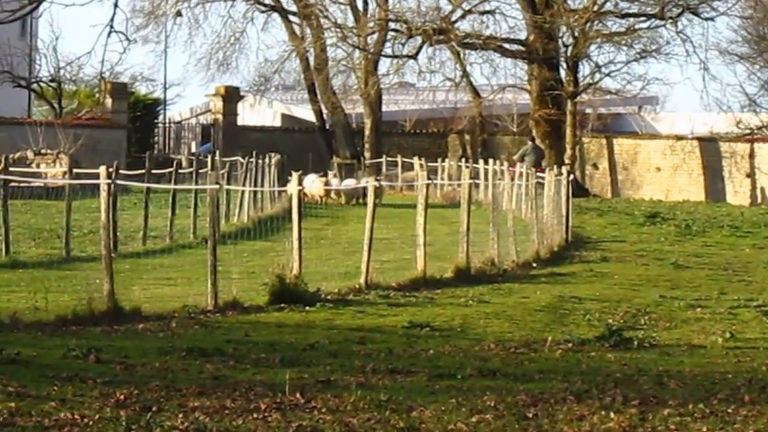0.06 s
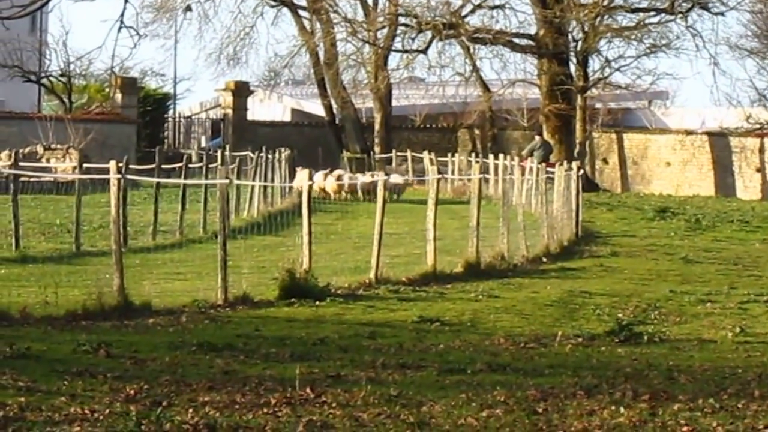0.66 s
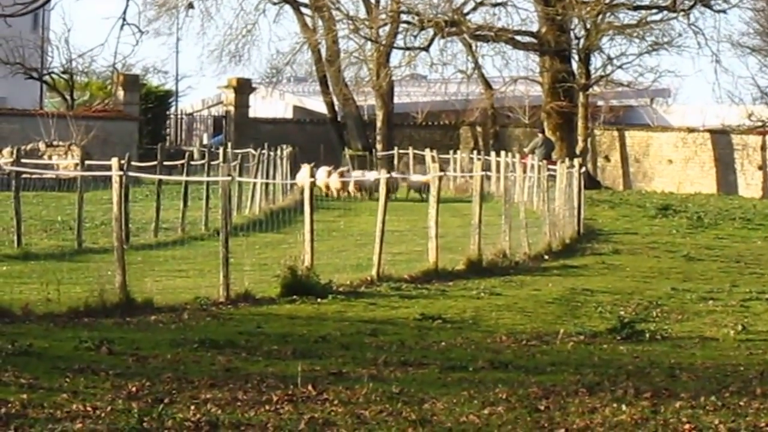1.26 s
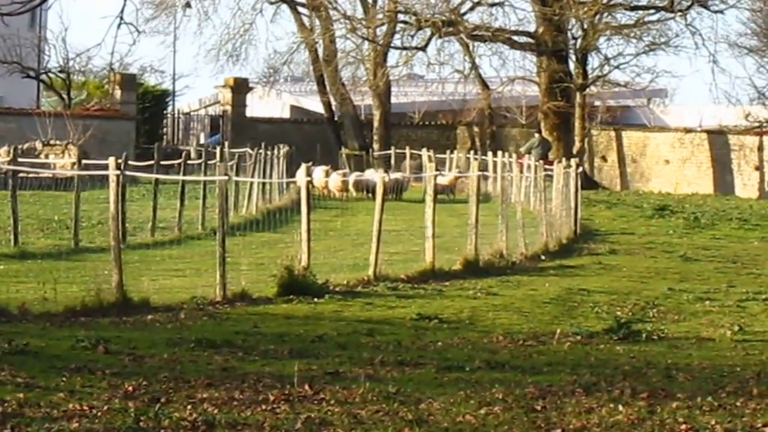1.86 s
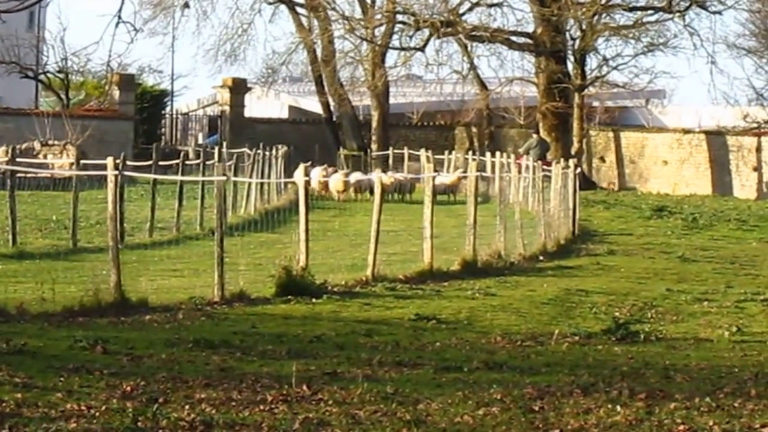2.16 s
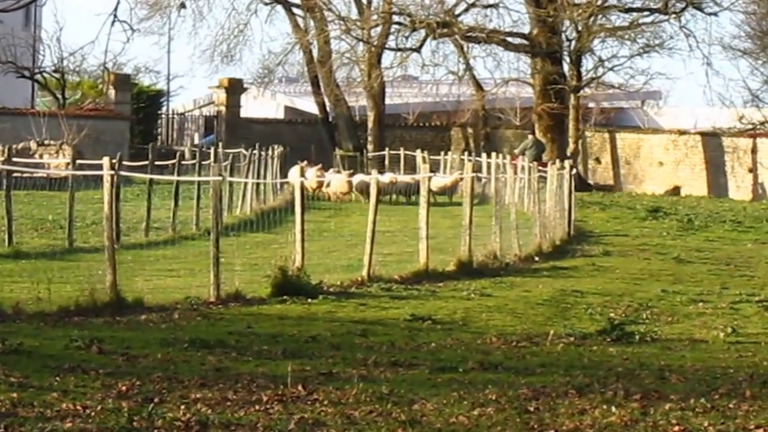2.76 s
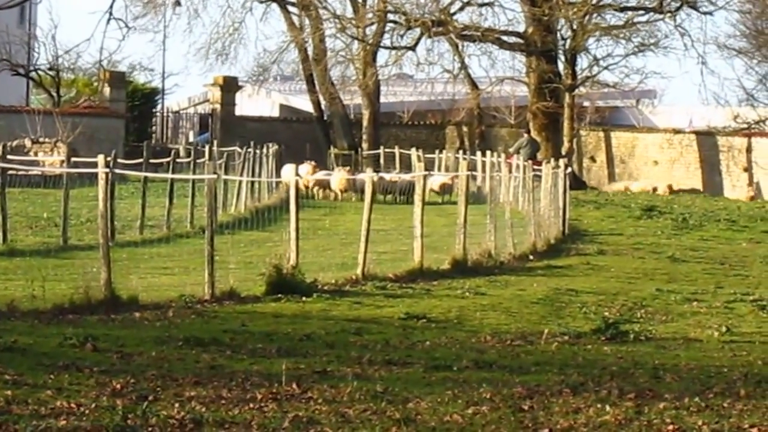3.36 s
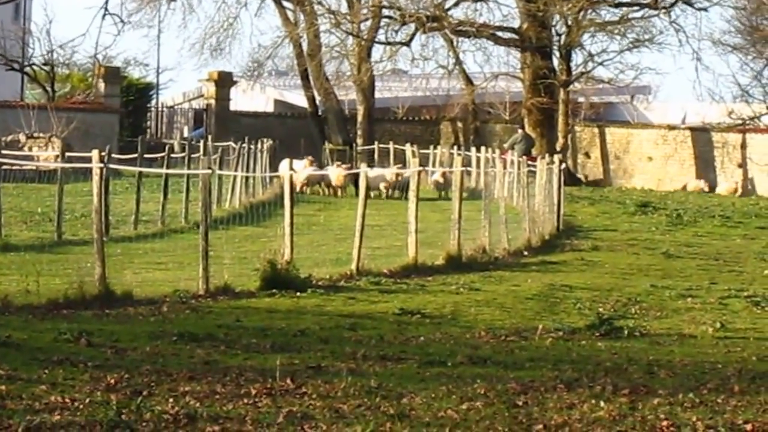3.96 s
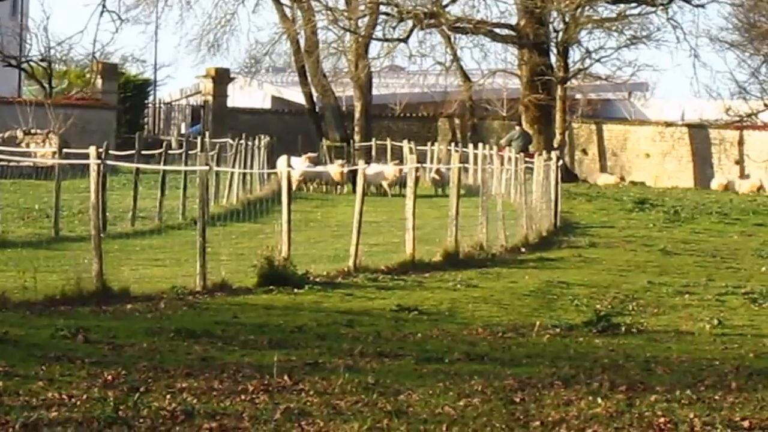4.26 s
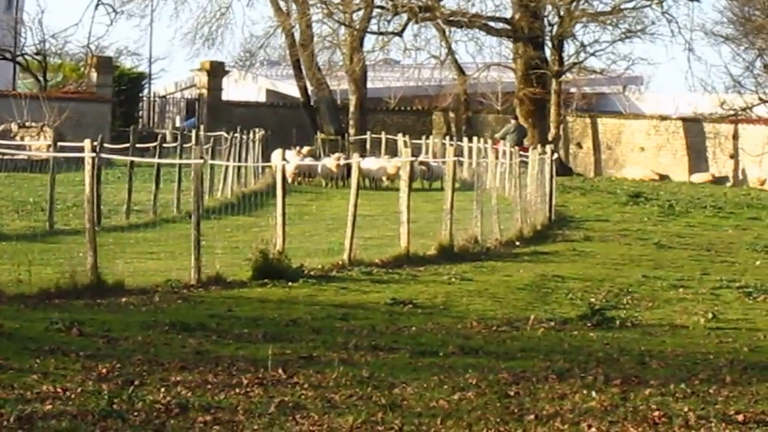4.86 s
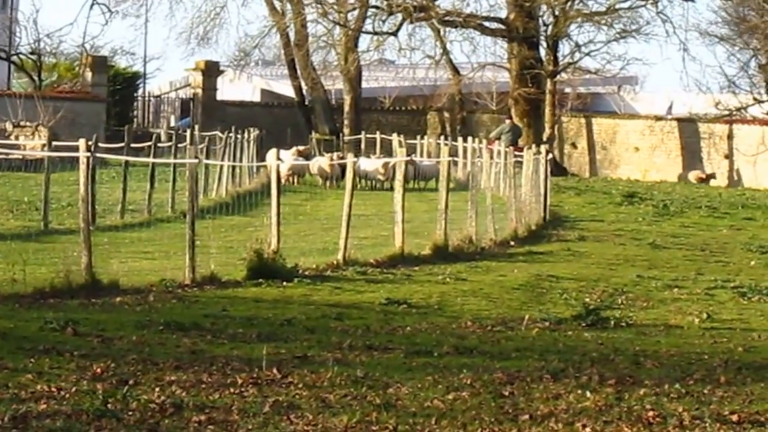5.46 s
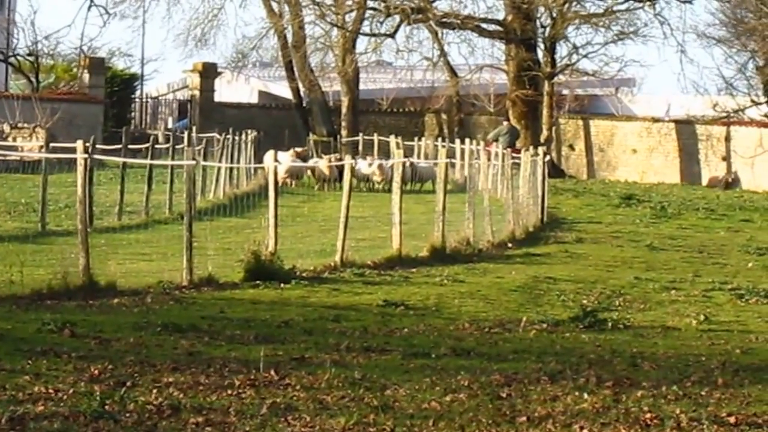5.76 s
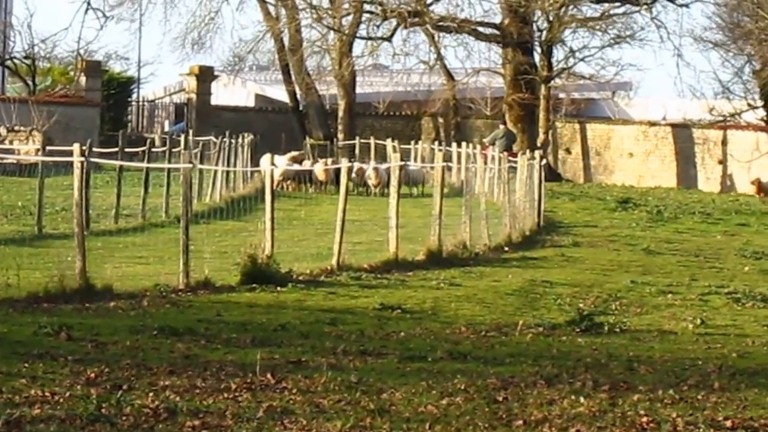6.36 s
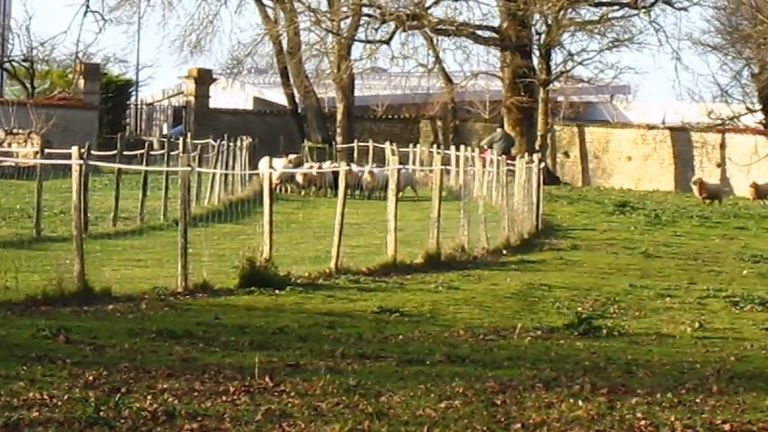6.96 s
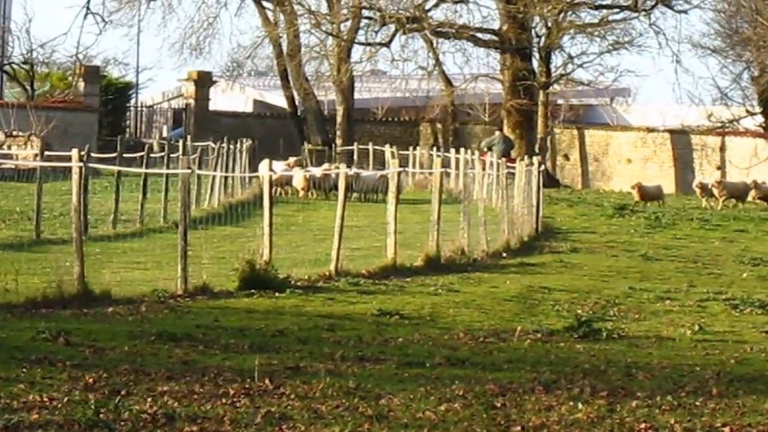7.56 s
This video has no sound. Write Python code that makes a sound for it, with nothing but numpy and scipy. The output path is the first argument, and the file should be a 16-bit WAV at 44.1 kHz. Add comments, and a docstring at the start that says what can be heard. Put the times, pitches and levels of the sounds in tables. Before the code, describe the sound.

Low, fluttering wind noise hits the microphone up close, over a faint hiss of grass and distant air in a field. Farther away, small birds give short sharp chips, whistles and high sliding notes, with a hoarse little call about midway. The gusts drop to a light rumble for the last couple of seconds, where a second hoarse call comes through more clearly, followed by a faint dry tick.

```python
"""Wind and small birds in an open pasture bordered by trees and a wall.
From the start, gusts buffet the microphone over a soft grass hiss and a distant wash of air: the faster
the air, the quicker its eddies pass and the higher the rumble reaches. Birds call some way off, first
with whistles and sharp chips, then, after the first of a few faint ticks, with thin slurs and pips.
Near 4 s comes a hoarse "weet". After 5.5 s the wind eases, and a second "weet" stands out."""
import sys
import numpy as np
from scipy import signal
from scipy.fft import rfft, irfft, next_fast_len
from scipy.io import wavfile
from scipy.ndimage import uniform_filter1d, map_coordinates

SR = 44100
rng = np.random.default_rng(int(sys.argv[2]) if len(sys.argv) > 2 else 0)


def bounce(signal):
    """Save signal as a 16-bit WAV file at the path given by the first command-line argument."""
    frames = np.transpose(np.atleast_2d(signal))
    limited = np.clip(frames, -1, 1)
    pcm = np.round(limited * 32767).astype(np.int16)
    wavfile.write(sys.argv[1], SR, pcm)


N = 336483
TIME = np.arange(N) / SR


def undb(db):
    """Decibels to gain."""
    return 10 ** (np.asarray(db) / 20)


def unit(x):
    """Scale to rms 1."""
    return x / np.sqrt(np.mean(x ** 2))


def curves(table):
    """One automation curve for each value column of a timed table."""
    times, *columns = np.transpose(table)
    return [np.interp(TIME, times, column) for column in columns]


def walk(rate):
    """Smooth random modulation of rms 1 that moves about rate times a second."""
    hold = max(int(SR / rate), 1)
    steps = np.repeat(rng.standard_normal(N // hold + 1), hold)
    return unit(uniform_filter1d(uniform_filter1d(steps, hold), hold)[:N])


def noise(spectrum, size=N):
    """Noise of rms 1 coloured by (Hz, dB) points."""
    hz, db = np.transpose(spectrum)
    n = next_fast_len(size)
    bin_hz = np.maximum(np.arange(n // 2 + 1) * SR / n, 1)
    colour = undb(np.interp(np.log(bin_hz), np.log(hz), db))
    return unit(irfft(rfft(rng.standard_normal(n)) * colour, n)[:size])


def add(out, s, sound):
    """Mix a sound in at time s."""
    i = int(s * SR)
    part = sound[max(-i, 0):max(N - i, 0)]
    out[max(i, 0):max(i, 0) + len(part)] += part


def progress(length):
    """A ramp from 0 to 1 through a note."""
    return np.linspace(0, 1, int(length * SR))


def climb(length, share):
    """The part of a rise still to come: 1 at the start, 0 once the note holds its top."""
    return np.maximum(1 - progress(length) / share, 0)


# light air between gusts: (time [s], pressure [dB])
LIGHT_AIR = [(0, -24), (1.8, -26), (2.2, -34), (3.1, -32), (3.8, -29), (4.6, -31), (5.5, -30.5),
             (5.72, -33), (5.8, -45), (6.1, -32), (6.7, -35), (7.63, -35)]
# gusts at the microphone: (start [s], length [s], pressure [dB], flutter relative to pressure [dB])
GUST_CUES = [(-.03, 0.072, -17, -11), (0.069, .04, -20, -18), (0.257, 0.19, -19.5, -17),
             (.495, 0.043, -17, -14), (0.604, 0.053, -24, -10), (0.714, .14, -20.5, -13),
             (.915, .2, -18.5, -17), (1.158, .14, -19.5, -23), (1.35, 0.16, -21, -25),
             (1.555, 0.097, -22, -19), (1.713, 0.092, -16, -23), (1.886, 0.18, -20.5, -13),
             (2.106, 0.072, -24, -11), (2.236, .075, -24.5, -14), (2.452, 0.17, -22, -13),
             (2.669, 0.26, -17.5, -19), (3.047, 0.041, -20, -17), (3.199, 0.059, -21, -21),
             (3.35, 0.089, -22, -21), (3.438, 0.071, -19, -18), (3.573, .05, -22, -21),
             (3.699, 0.051, -20, -27), (4.157, .21, -19, -15), (4.38, 0.072, -23, -15.5),
             (4.68, .23, -17, -14), (4.93, 0.056, -23, -19), (5.075, .15, -19.5, -16),
             (5.242, .03, -16.5, -8), (5.331, 0.1, -23, -25), (5.951, 0.079, -22, -35),
             (6.296, 0.054, -23.5, -35), (6.482, 0.062, -29, -29.5), (6.778, 0.073, -29, -29.5),
             (7.048, .13, -30.5, -31.5), (7.348, 0.24, -26, -36)]


def gusts(attack_s=.012, release_s=.028, arch_db=2.5, lull_flutter_db=-26, waver_db=1., edge_dull=.6):
    """Pressure and flutter envelopes in dB: each gust rises, arches and dies, fluttering most on top."""
    pressure = undb(curves(LIGHT_AIR)[0]) ** 2
    flutter = pressure * undb(lull_flutter_db) ** 2
    for s, length, db, flutter_db in GUST_CUES:
        attack = .5 + .5 * np.tanh((TIME - s) / attack_s)
        arch = undb(arch_db * (np.sin(np.pi * np.clip((TIME - s) / length, 0, 1)) - .5))
        release = np.exp(-np.maximum(TIME - s - length, 0) / release_s)
        swell = attack * arch * release
        power = (undb(db) * swell) ** 2
        pressure += power
        flutter += power * (undb(flutter_db) * swell ** edge_dull) ** 2
    return 10 * np.log10(pressure) + waver_db * walk(22.165), 10 * np.log10(flutter / pressure)


# tone of the rumble at a middling wind speed: (frequency [Hz], relative level [dB])
RUMBLE_EQ = [(10, 12.5), (30, -9.5), (70, -2), (130, -2.5), (220, -8), (330, -15.5), (500, -27), (750, -42),
             (1200, -58), (2500, -89)]


def wind(pressure_db, flutter_db, mid_flutter_db=-14., mid_pressure_db=-21., buffet_db=2., port_hz=29.4):
    """Turbulence blows past the microphone port: its whole spectrum slides with the air speed."""
    surge = walk(130)
    # the air is fastest where it both flutters and presses hard
    octaves = (flutter_db - mid_flutter_db) / 19 + .012 * (pressure_db - mid_pressure_db)
    speed = 2 ** (np.clip(octaves, -1.15, .2) + .18 * surge)
    turbulence = noise(RUMBLE_EQ, size=2 * N)
    flow = map_coordinates(turbulence, [np.cumsum(speed)], order=3, mode="wrap")
    flow = signal.sosfilt(signal.butter(2, port_hz, "high", fs=SR, output="sos"), flow)
    flow *= undb(buffet_db * surge)  # a brief surge pushes harder as well as faster
    # over a tenth of a second the gust alone sets the level
    power = uniform_filter1d(uniform_filter1d(flow ** 2, size=SR // 14), size=SR // 25)
    return flow / np.sqrt(power) * undb(pressure_db)


# fader rides for the background bed: (time [s], grass hiss [dB], distant wash [dB])
BED_FADERS = [(0.0, -70, -59), (0.42, -68, -62.5), (0.68, -69.5, -63.5), (2.1, -70.5, -64.5),
              (2.51, -69.5, -63), (2.97, -73, -66.5), (3.61, -70, -64), (4.1, -68.5, -61), (4.33, -69, -64),
              (4.97, -72, -67.5), (5.55, -72, -65.5), (6.59, -66.5, -62), (6.91, -66, -60),
              (7.63, -67.5, -62)]
# bright hiss of grass and twigs: (frequency [Hz], relative level [dB])
GRASS_EQ = [(500, -25.5), (2000, -3), (3500, 0), (5000, -1), (7000, -2.5), (9000, -4), (12000, -9),
            (15500, -16)]
# dull wash of distant air: (frequency [Hz], relative level [dB])
WASH_EQ = [(40, 3), (300, -2), (600, 3.5), (950, 3), (1300, -1.5), (1800, -2), (2800, -8), (4500, -16),
           (9000, -30)]


def breeze(hiss_trim_db=8., wash_trim_db=7., rustle_db=1., drift_db=1.53):
    """Grass and twigs hiss with a slight rustle; the distant wash drifts smoothly."""
    grass_db, wash_db = curves(BED_FADERS)
    hiss = noise(GRASS_EQ) * undb(grass_db + hiss_trim_db + rustle_db * walk(60))
    wash = noise(WASH_EQ) * undb(wash_db + wash_trim_db + drift_db * walk(6.6))
    return hiss + wash


# thumps of single hard eddies: (time [s], relative level [dB], centre [Hz])
HARD_EDDIES = [(.004, -6.5, 337), (.511, -14, 328.7), (.612, -13, 340), (.642, -12, 330), (.742, -16, 348),
               (.795, -16, 330), (.992, -12.5, 310), (1.24, -16.5, 285.9), (1.893, -8, 334),
               (1.943, -3.5, 373), (1.986, -15, 343), (2.039, -12.5, 370), (2.106, -15, 367),
               (2.464, -15, 295), (2.487, -8, 236), (2.544, -10.5, 260.4), (2.755, -11.5, 339),
               (2.781, -10, 170), (2.881, -15.5, 404.5), (3.064, -12.5, 280.2), (3.475, -15.5, 297),
               (4.178, -4.5, 261), (4.239, -14.5, 355), (4.348, -7, 364), (4.618, -16.5, 307),
               (4.703, -7.5, 226.6), (4.778, -23, 398), (4.868, -10, 191), (5.165, -5.5, 207.5),
               (5.193, -11, 335), (5.252, -14, 474.4), (5.262, -7, 267.7), (5.271, -5, 351),
               (6.105, -26.5, 259.9)]


def eddies(pressure_db, flutter_db, trim_db=-1.5, attack_cycles=.21, release_ratio=1.23, small_hz=320.):
    """A tight vortex hits the port: one pointed swing of pressure, either way, letting go more slowly."""
    out = np.zeros(N)
    t = np.arange(-SR // 10, SR // 10) / SR
    # between the hard ones, small vortices ride on every gust
    small_db = pressure_db + flutter_db + 4.5
    places = rng.integers(N, size=260)
    scatter = rng.standard_normal((len(places), 2))
    small = [(i / SR, small_db[i] + .5 * louder, small_hz * 2 ** (higher / 4))
             for i, (louder, higher) in zip(places, scatter)]
    for s, db, hz in small + list(HARD_EDDIES):
        age = t * hz / attack_cycles
        spike = 2 / (np.exp(-age) + np.exp(age / release_ratio))
        swing = np.cos(2 * np.pi * (hz * t + rng.random()))
        add(out, s + t[0], undb(db + trim_db) * spike * swing)
    return out


# blurred calls of faraway birds: (middle [s], half length [s], centre [Hz], level [dB])
FAR_CUES = [(0.018, 0.12, 4330, -58.5), (.3, 0.16, 6650, -63.5), (0.721, 0.17, 1680, -60),
            (2.292, 0.17, 2060, -71), (3.303, .25, 1140, -64), (3.656, .09, 5395, -67),
            (6.421, 0.1, 4246, -63), (6.542, 0.057, 5825, -63), (7.344, 0.086, 7620, -62)]


def far_calls(spread=1.36):
    """From far birds only the scattered sound arrives: a narrow band that swells and fades."""
    out = np.zeros(N)
    t = np.arange(-SR // 2, SR // 2) / SR
    for s, half_s, hz, db in FAR_CUES:
        band = [(hz / 2, -60), (hz / spread, -20), (hz, 0), (hz * spread, -20), (hz * 2, -60)]
        swell = np.exp(-(t / half_s) ** 2)
        add(out, s + t[0], undb(db) * swell * noise(band, size=len(t)))
    return out


def whistles(parts, trim_db=.5, flicker_db=3., waver=.028, fade_share=.2):
    """Play each part's (start, pitch curve, level, roughness) notes as sines; rough ones waver fast."""
    out, tremble, flicker = np.zeros(N), walk(700), walk(130)
    for notes in parts:
        for s, pitch, db, rough in notes:
            along = np.linspace(0, 1, len(pitch))
            here = (int(s * SR) + np.arange(len(pitch))) % N
            hz = pitch * (1 + waver * rough * tremble[here])
            tone = np.sin(2 * np.pi * np.cumsum(hz) / SR)
            swell = np.sin(np.pi / 2 * np.clip(np.minimum(along, 1 - along) / fade_share, 0, 1))
            add(out, s, undb(db + trim_db + flicker_db * flicker[here]) * swell * tone)
    return out


# plain whistles: (start [s], length [s], from [Hz], to [Hz], relative level [dB], roughness [0-1])
PLAIN_CUES = [(0.064, 0.42, 3900, 2820, -63, 0.9), (.615, 0.084, 6280, 6340, -66, 0.2),
              (.805, 0.13, 6200, 6230, -58, .47), (.99, 0.068, 2120, 2128, -62, .1),
              (1.073, 0.28, 2900, 2784, -64, 0.53), (1.88, 0.16, 6330, 6520, -68, 0.5),
              (1.933, 0.092, 2600, 2590, -68, 0.3), (2.424, 0.46, 3100, 2127, -61, .4),
              (3.34, 0.17, 6600, 6650, -69.5, .7), (3.41, .066, 4398, 4405, -67, 0.79),
              (4.042, .09, 5250, 5630, -63.5, 0.8), (4.143, .04, 6700, 6700, -62, .3),
              (4.21, .08, 3478, 3603, -67, .3), (4.3, .032, 5200, 5112, -64, .2),
              (6.092, 0.062, 5880, 5845, -60, 0.3), (7.039, .12, 5780, 5716, -66, .4)]


def plain_notes(ease=1.4):
    """A bird holds a note, or eases it down or slightly up."""
    for s, length, first_hz, last_hz, db, rough in PLAIN_CUES:
        yield s, last_hz + (first_hz - last_hz) * (1 - progress(length)) ** ease, db, rough


def pasture(song, wet_db=-6.5, t60_s=.51, onset_s=.01):
    """Trunks and the wall scatter the song into a thin reverb tail."""
    t = np.arange(SR) / SR
    tail = rng.standard_normal(SR) * undb(-60 * t / t60_s) * (1 - np.exp(-t / onset_s))
    return song + undb(wet_db) * signal.fftconvolve(song, tail / np.linalg.norm(tail))[:N]


# sharp "chip" calls: (start [s], pitch [Hz], relative level [dB], pitch sag [share/s], octave mix [dB])
CHIP_CUES = [(0.232, 4090, -50, 0.28, -5), (.568, 4210, -48.5, 2.6, -15), (1.283, 4016, -47, 0.42, -17),
             (1.713, 4170, -47.5, 2.7, -15), (2.463, 4130, -50.5, .1, -10), (2.891, 4190, -51.5, .1, -22)]


def chips(trim_db=2., drop=.327, drop_s=.0027, peak_s=.021, width_s=.0095, rasp=.013, flicker_db=2.5):
    """Each chip plunges onto its pitch and sags, slightly raspy, with an octave and a second voice."""
    out, tremble, flicker = np.zeros(N), walk(900), walk(300)
    t = np.arange(SR // 15) / SR
    for s, hz, db, sag, octave_db in CHIP_CUES:
        here = int(s * SR) + np.arange(len(t))
        bend = drop * np.exp(-t / drop_s) - sag * (t - peak_s) + rasp * tremble[here]
        phase = 2 * np.pi * np.cumsum(hz * (1 + bend)) / SR
        second_voice = undb(-16.5) * np.sin(1.43 * phase)
        tone = np.sin(phase) + undb(octave_db) * np.sin(2 * phase) + second_voice
        swell = np.exp(-.5 * ((t - peak_s) / width_s) ** 2) * (1 - np.exp(-t / .0015))
        add(out, s, undb(db + trim_db + flicker_db * flicker[here]) * swell * tone)
    return out


# faint dry ticks: (time [s], level [dB], centre [Hz], decay [s])
TICK_CUES = [(.712, -55.5, 7990, .003), (2.011, -47.5, 4500, 0.0023), (5.49, -62, 10930, 0.014),
             (5.575, -57, 9040, 0.0044), (6.632, -53, 7000, 0.022)]


def ticks():
    """Tiny broadband bursts that die at once."""
    out = np.zeros(N)
    t = np.arange(SR // 10) / SR
    for s, db, hz, decay_s in TICK_CUES:
        burst = noise([(hz / 4, -20), (hz, 0), (2 * hz, -14)], size=len(t))
        add(out, s, undb(db) * burst * np.exp(-t / decay_s))
    return out


# downstrokes of the thin high song: (start [s], length [s], end pitch [Hz], relative level [dB])
FALL_CUES = [(0.76, 0.075, 6400, -62), (1.263, 0.034, 8000, -57.5), (1.814, .035, 7996, -63),
             (2.498, 0.12, 7000, -64), (3.236, .135, 7130, -60.5), (3.99, 0.14, 6554, -57.5),
             (4.248, 0.096, 6023, -52)]


def falling_slurs(top_hz=8380, lag=1.3, rough=.48):
    """Each note hangs at the same top pitch, then slides down and levels out."""
    for s, length, last_hz, db in FALL_CUES:
        height = np.cos(np.pi / 2 * progress(length) ** lag) ** 2
        yield s, last_hz + (top_hz - last_hz) * height, db, rough


# upstrokes of that song: (start [s], length [s], top [Hz], relative level [dB], climb [share of note])
RISE_CUES = [(1.01, 0.17, 7160, -58.5, 0.87), (1.36, 0.15, 7980, -59, .7), (1.6, 0.14, 7500, -55, 0.73),
             (2.06, 0.14, 8400, -56.5, 0.49), (2.745, .135, 8100, -63, .3), (3.48, .17, 8240, -58.5, .45)]


def rising_slurs(scoop=.11, swell_db=10.5, rough=.5):
    """Each note scoops up from below, swelling as it climbs, then holds."""
    for s, length, top_hz, db, share in RISE_CUES:
        below = climb(length, share)
        yield s, top_hz * (1 - scoop * below), db - swell_db * below, rough


# runs of faint pips: (start [s], relative level [dB])
PIP_CUES = [(1.41, -65.5), (2.665, -66.5)]


def pips(hz=5240, length_s=.027, step_s=.08, spread=.012, rough=.2):
    """Three quick held notes, each slightly detuned."""
    for s, db in PIP_CUES:
        for k, detune in enumerate(spread * rng.standard_normal(3)):
            yield s + k * step_s, np.full(int(length_s * SR), hz * (1 + detune)), db, rough


# lower, hoarse "weet" calls: (start [s], length [s], top [Hz], relative level [dB])
WEET_CUES = [(3.867, .11, 4285, -60.5), (6.298, .09, 4320, -50.5)]


def weets(scoop=.15, climb_share=.55, end_rough=1.6):
    """The call starts clean and roughens as it rises and holds."""
    for s, length, top_hz, db in WEET_CUES:
        yield s, top_hz * (1 - scoop * climb(length, climb_share)), db, end_rough * progress(length)


def scene():
    """The mono mix: wind up front, birds across the field, breeze and ticks behind."""
    song = whistles([plain_notes(), falling_slurs(), rising_slurs(), pips(), weets()])
    birds = pasture(song + chips()) + far_calls()
    air = gusts()
    return (wind(*air) + eddies(*air) + birds + breeze() + ticks())[None]


def record(dry):
    """A 4 ms fade-in and a steep high cut."""
    fade_in = np.sin(np.pi / 2 * np.minimum(TIME / .004, 1)) ** 2
    high_cut = signal.ellip(10, .1, 80, 15500, fs=SR, output="sos")
    return signal.sosfilt(high_cut, dry * fade_in)


dry = scene()
out = record(dry)
bounce(out)
```